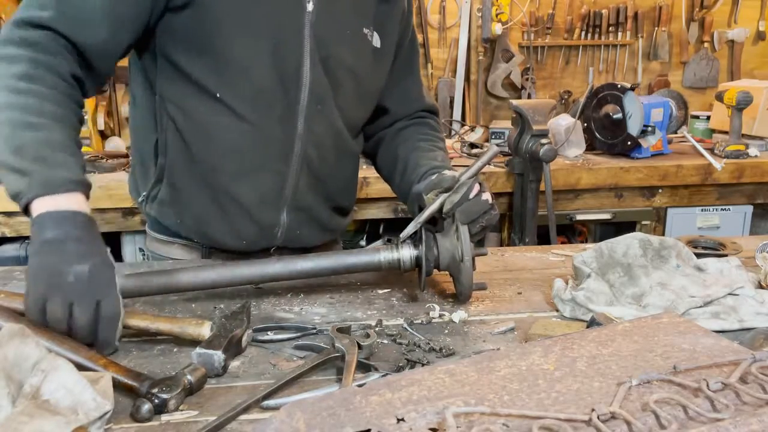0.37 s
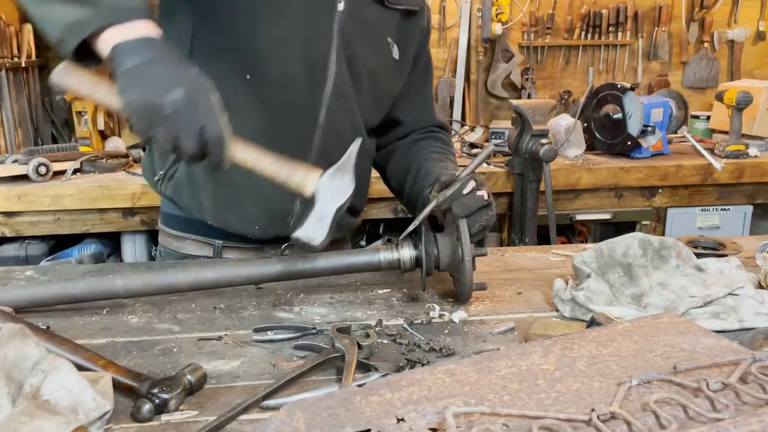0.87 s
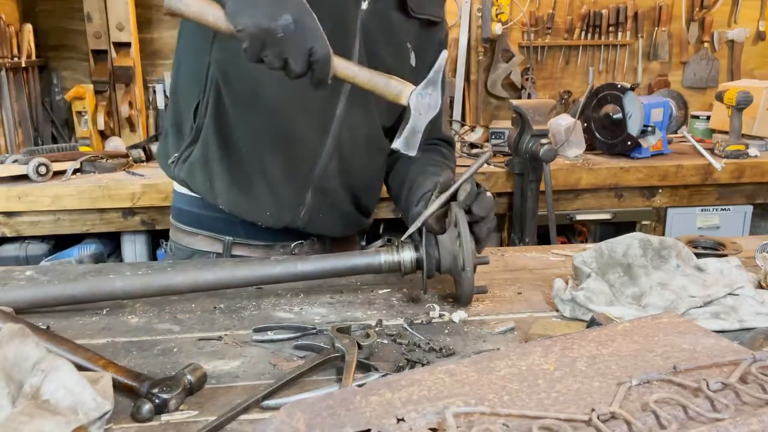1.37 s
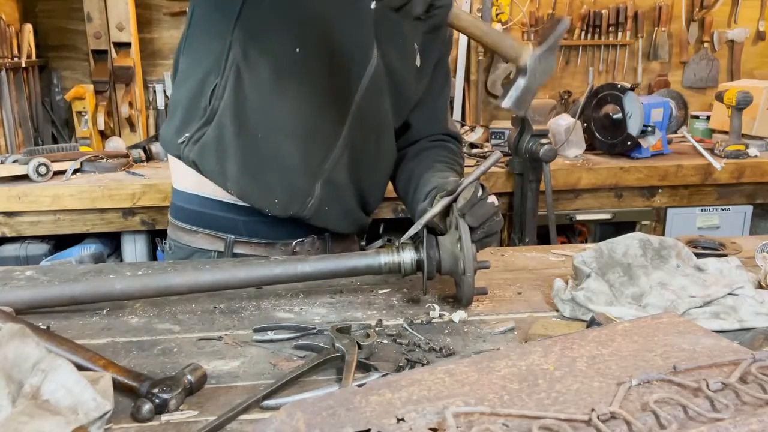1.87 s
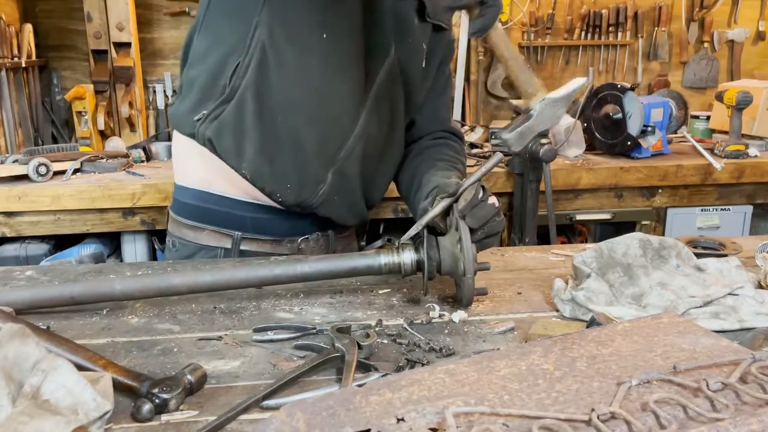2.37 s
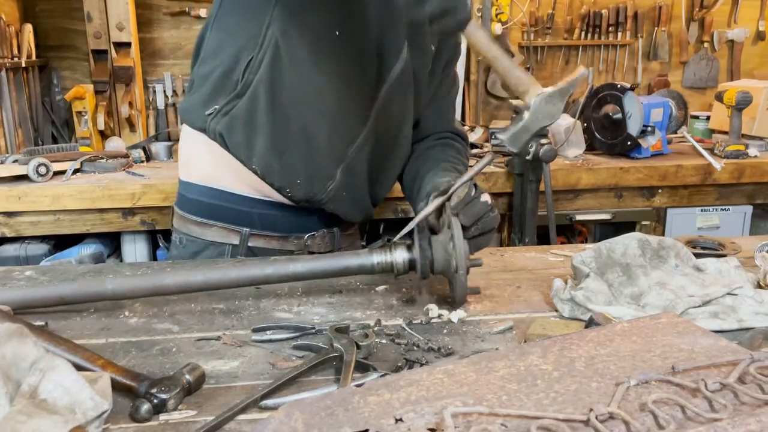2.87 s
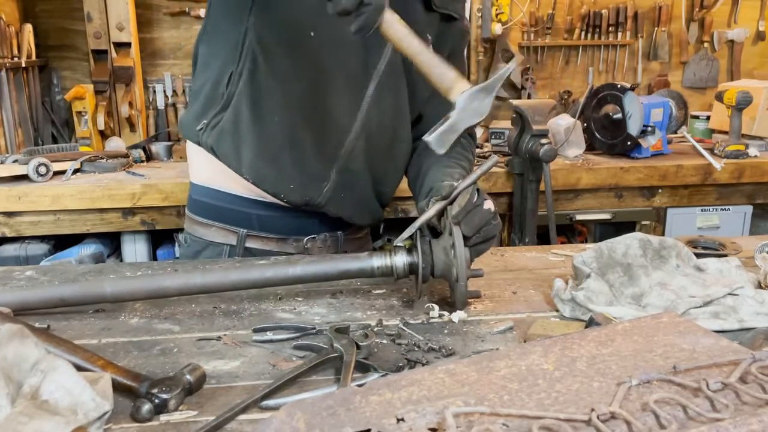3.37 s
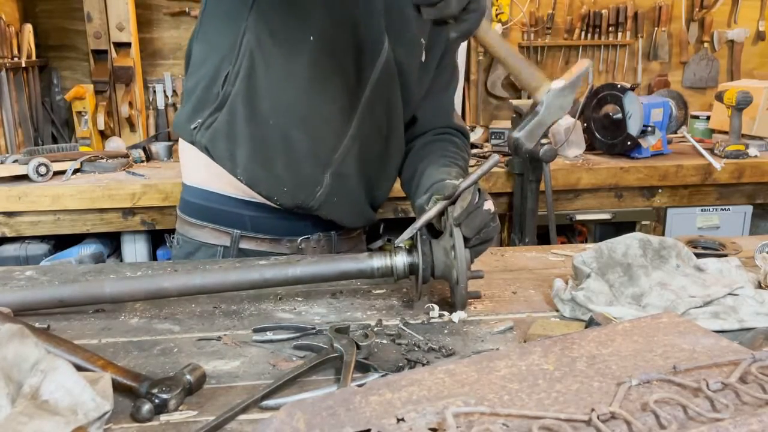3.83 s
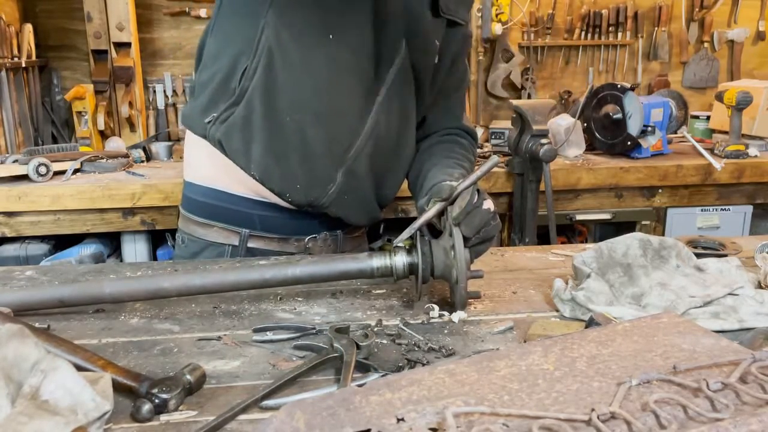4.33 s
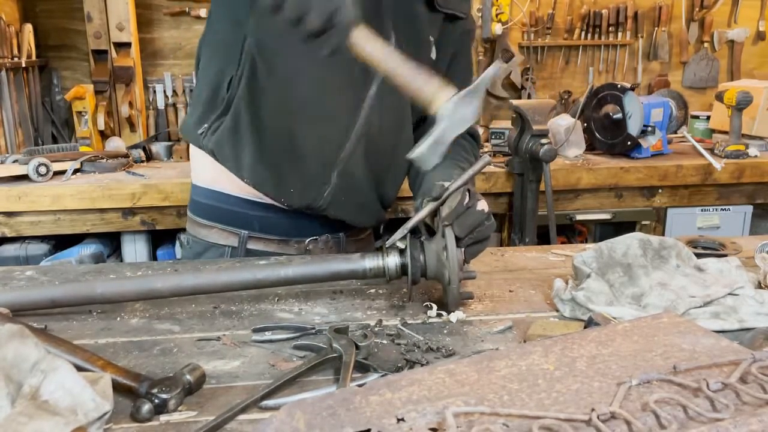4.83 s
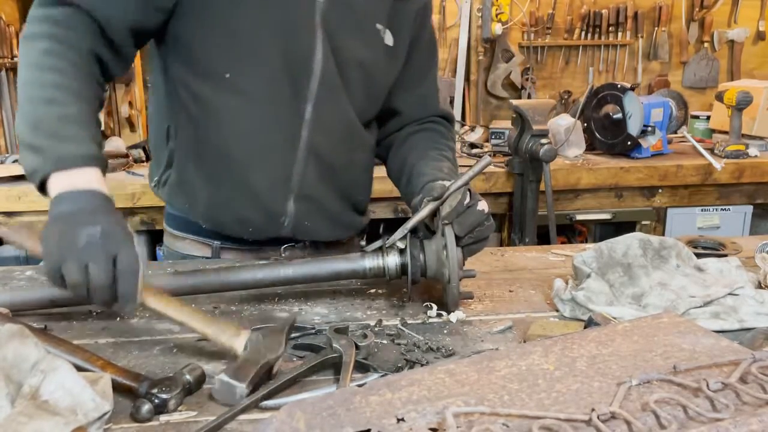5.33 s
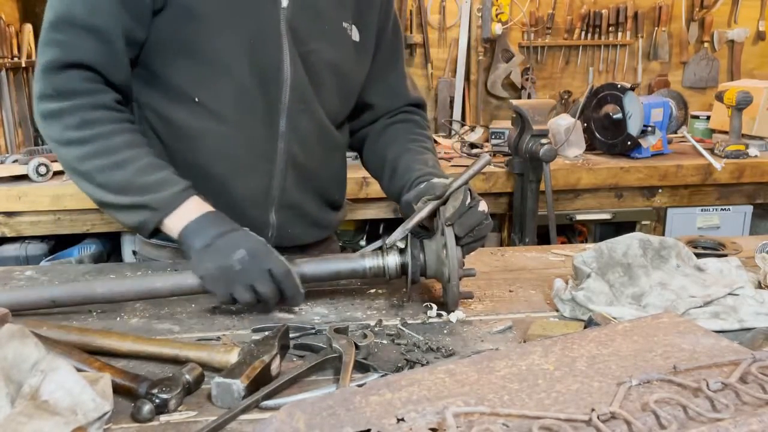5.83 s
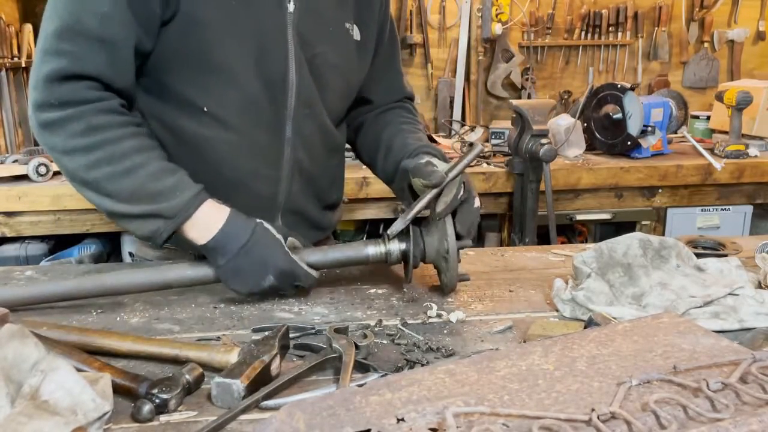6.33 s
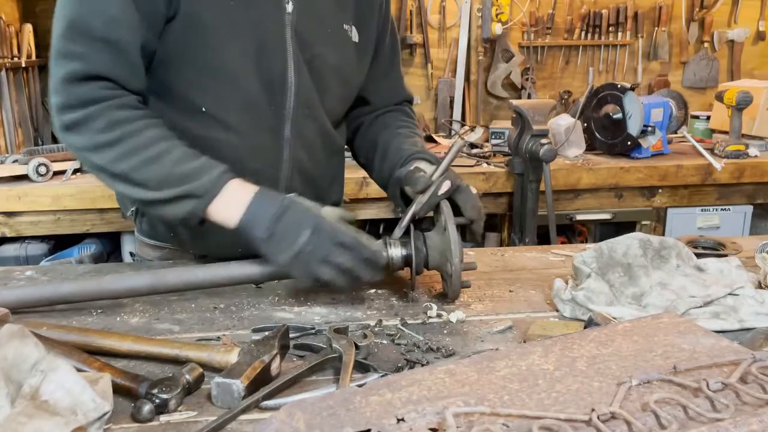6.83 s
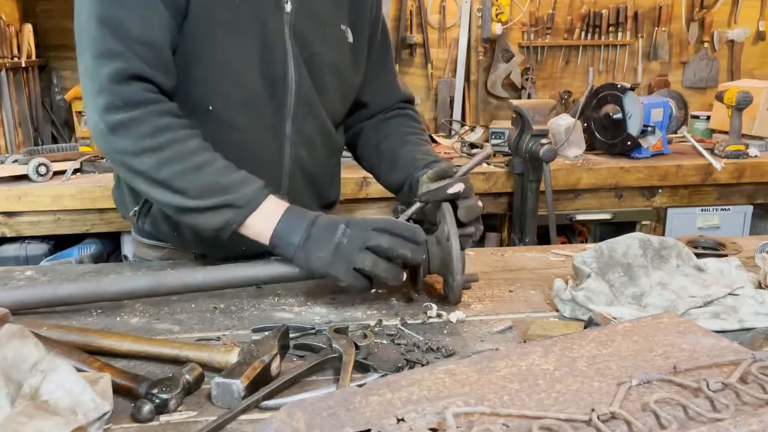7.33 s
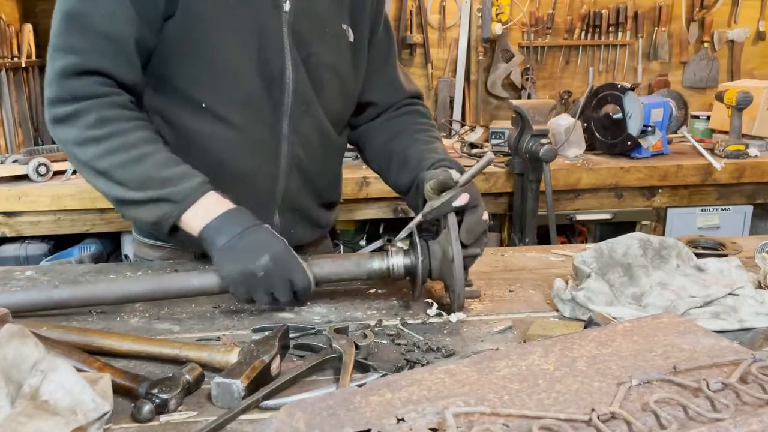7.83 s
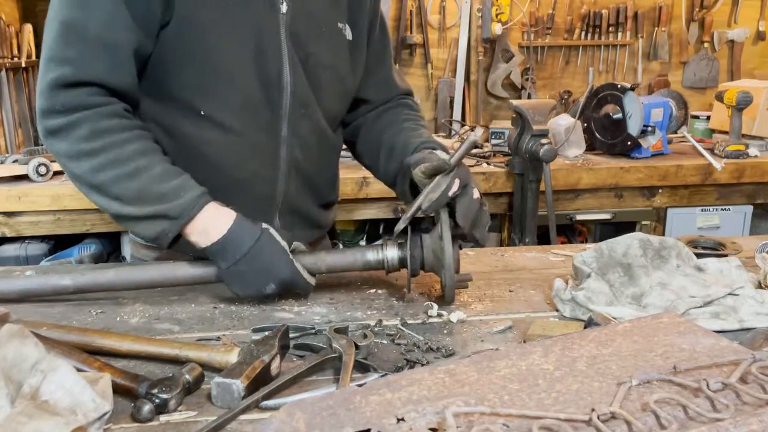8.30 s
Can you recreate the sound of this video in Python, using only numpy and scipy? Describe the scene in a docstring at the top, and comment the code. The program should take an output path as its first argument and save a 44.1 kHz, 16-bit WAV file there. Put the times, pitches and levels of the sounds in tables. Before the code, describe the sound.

Four hard, ringing hammer blows on a chisel against a steel shaft, unevenly spaced, then the hammer clatters down among tools and faint handling follows.

```python
"""In a small workshop a hammer drives a chisel against the hub of a steel shaft on a wooden bench.
Contacts are shaped noise bursts; bench, chisel, hub, shaft, flange, hammer head and loose tools are
decaying resonators, struck, rocked or rubbed by gloved hands. Cloth rustles as filtered noise.
After four blows the hammer is laid down among tools, and the loose hub clicks. A noise tail makes the
room, over a low hum; two ports of a phone hear it, and each blow overloads it with a low thump."""
import sys
import numpy as np
from scipy import signal
from scipy.fft import rfft, irfft, next_fast_len
from scipy.io import wavfile
from scipy.ndimage import uniform_filter1d

SR = 44100
rng = np.random.default_rng(int(sys.argv[2]) if len(sys.argv) > 2 else 0)


def invert_db(x):
    """Field ratio 10**(x/20) for x, a level in decibels (scalar or array-like)."""
    u = np.asarray(x, float) / 20
    return 10 ** u


def log_audio(samples):
    """Write samples as a 16-bit WAV file to the path given in sys.argv[1]."""
    # one column per channel
    frames = np.atleast_2d(samples).T
    # limit to full scale, then quantise
    limited = np.clip(frames, -1, 1)
    pcm = np.round(limited * 32767).astype(np.int16)
    wavfile.write(sys.argv[1], SR, pcm)


N = 372204
SIZE = next_fast_len(N + SR)  # transform length, with a second to spare for the room tail
HZ = np.maximum(np.arange(SIZE // 2 + 1) * SR / SIZE, 1)

# All levels are relative dB.
# Workshop hum spectrum: pitch_hz, level_db
HUM_SPECTRUM = [(12, -46), (20, -11.5), (53, 3), (101, 7), (241, -3.5), (446, -5.5), (1000, -19.5),
                (2670, -22.5), (3070, -34.5), (4060, -34), (4420, -52), (4940, -34.5), (6010, -45),
                (11400, -48), (16000, -67)]
# Hum level over time: time_s, level_db
HUM_LEVEL_CURVE = [(0.0, -53), (2.87, -51.5), (4.6, -50), (4.951, -60), (7.05, -60.5), (8.44, -62)]
# Stereo width of the hum: pitch_hz, side_re_mid_db
HUM_WIDTH = [(30, -26.5), (60, -10.5), (200, -9), (400, 0), (1000, 4), (2400, -7.5), (4400, -2),
             (8000, -10), (15000, -14)]
# Moves of hands and parts: hold_start_s, hold_length_s, shaft_rocking_on_wood_db,
# glove_rubbing_steel_db, cloth_rustle_db
HAND_MOVES = [(0.24, .1, -58.5, -90, -72.5), (0.396, .08, -69, -88, -71), (0.57, 0.17, -61.5, -74.5, -76.5),
              (0.835, .09, -58.5, -72, -74), (1.145, 0.054, -57, -88, -69.5),
              (1.266, 0.046, -66, -75, -64.5), (1.358, 0.01, -42, -54.5, -70.5), (1.465, .1, -57, -78, -70),
              (1.787, 0.073, -71, -89, -65), (1.95, 0.086, -72, -95, -80), (2.948, 0.11, -53, -55, -42),
              (3.068, .2, -41.5, -58, -52), (3.316, 0.14, -54.5, -67, -73), (3.573, 0.029, -59, -72.5, -98),
              (3.739, 0.037, -59, -71, -76.5), (4.096, 0.1, -60.5, -75, -61),
              (4.532, 0.031, -27.5, -36.5, -36.5), (4.617, .12, -54, -54, -48),
              (4.875, 0.061, -59, -94.5, -77), (5.038, 0.063, -62.5, -75.5, -73),
              (5.49, 0.17, -37.5, -84, -67.5), (5.75, 0.21, -73.5, -77, -76),
              (6.038, 0.18, -69, -69.5, -70), (6.216, 0.1, -52, -69.5, -63), (6.374, 0.11, -69.5, -81, -74),
              (6.511, 0.12, -61.5, -66.5, -65), (6.7, 0.072, -61.5, -69, -70.5),
              (6.794, 0.11, -56.5, -62.5, -68.5), (6.962, 0.13, -63.5, -94, -71.5),
              (7.114, 0.17, -66.5, -64.5, -67), (7.307, 0.24, -79.5, -87, -86), (7.53, .12, -79, -76, -77),
              (7.707, 0.25, -74, -83.5, -76.5), (7.985, 0.094, -71, -86, -65),
              (8.194, 0.041, -34, -60.5, -52.5), (8.279, 0.058, -62.5, -68, -59.5)]
# Cloth rustle spectrum: pitch_hz, level_db
CLOTH_SPECTRUM = [(1500, 12), (3000, 11), (6000, 5), (9000, 5), (13000, -12.5), (15000, -16)]
# Chisel touching steel: start_s, crack_db, bench_db, chisel_ring_db, tilt_db_per_octave
CHISEL_TOUCHES = [(0.413, -21, -73, -45, -4.5), (0.6075, -41, -54, -59, -3), (1.1544, -32, -77, -50, -12),
                  (1.3623, -27, -52, -38.5, -2), (1.515, -55, -78, -39.5, -10),
                  (2.25, -18.5, -26.5, -31, -2.7), (2.9445, -21, -33.5, -32, -3),
                  (4.0781, -29, -36, -49, -3.5), (5.0578, -43, -55, -55, -0.8),
                  (7.1182, -49.5, -68, -46.5, 0.7)]
# Small bumps and clicks of handling, dull or bright:
# start_s, crack_db, bench_db, tilt_db_per_octave, chatter_ms
HANDLING_BUMPS = [(0.891, -50, -55, -1.1, 27), (1.26, -50, -62, -0.3, 8.7), (3.4197, -44.5, -87, -3, 8.9),
                  (3.7775, -69, -48.5, 1.1, 9.5), (4.8478, -46.5, -58, 0.5, 8), (6.1482, -64, -47, -6, 9.7),
                  (6.4798, -51, -67, -1.1, 12.7), (6.9191, -47, -47.5, -4, 7.2),
                  (7.0481, -60.5, -59.5, -5.5, 12.7), (7.222, -68.5, -55, -2.5, 8.6),
                  (7.5831, -64.5, -50, -0.3, 8.5), (7.988, -45.5, -50.5, 7, 8.3),
                  (8.1844, -41, -37.5, -9, 16)]
# Hammer on chisel: start_s, crack_db, bench_thud_db, ring_passed_from_chisel_to_shaft_db,
# favoured_shaft_pitch_hz (set by the contact point)
HAMMER_BLOWS = [(2.218, -6, -14.5, -0.5, 3600), (2.89, 1, -10.5, 5, 4180), (3.936, 2.5, -11.5, -6.5, 5460),
                (4.497, 5, -9, 2, 3150)]
# Hammer laid down among loose tools: start_s, crack_db, bench_db, tools_db, tilt_db_per_octave
LAYING_DOWN = [(5.2974, -36.5, -22, -76, -1.5), (5.303, -25.5, -29, -52.5, -1.04),
               (5.3368, -27, -37, -53.5, -2), (5.4078, -47, -36, -62, 2.5), (5.4318, -37, -29, -32, -2.5),
               (5.4378, -15, -27.5, -54, -2.36), (5.48, -31.5, -30.5, -43.5, 0.6),
               (5.5314, -23, -37, -36.5, -2.7), (5.5871, -16, -58, -15, -4),
               (5.6073, -21.5, -57.5, -27, -4), (5.6635, -25, -45.5, -30.5, -4)]
# Clicks of the loose hub: start_s, crack_db, bench_db, hub_ring_db, tilt_db_per_octave
HUB_CLICKS = [(6.2276, -46, -47, -51.5, -0.2), (7.5285, -46.5, -73, -41.5, 1.1),
              (7.734, -68.5, -74, -63, -2.8), (8.0448, -76, -65, -57, -5)]
# Contact noise spectrum: pitch_hz, level_db
CRACK_SPECTRUM = [(120, -30.5), (200, 4), (416, -4.5), (722, 2.5), (1620, -15), (2050, -7.5), (2470, -15.5),
                  (3970, -11.5), (5420, -13), (6520, -17.5), (8740, -11), (11500, -33), (12200, -20.5),
                  (14900, -29.5), (16000, -43.5)]

# Modes of the wooden bench: pitch_hz, level_db, t60_s
BENCH_MODES = [(107.4, -8, 0.2), (184, -0.5, 0.043), (207, -4.5, 0.04), (239.4, -6, 0.13), (306, -3, 0.061),
               (403.6, -10.5, .12), (464, -11, 0.12), (570, -8, .06), (725, -10, .06), (752, -13, 0.13),
               (880, -17, 0.087), (999, -18.5, 0.046), (1223, -19, 0.12)]
# Mode of the bench top: pitch_hz, level_db, t60_s
BENCH_TOP_MODE = [(124, 0.0072, 0.31)]
# Modes of the flange: pitch_hz, level_db, t60_s
FLANGE_MODES = [(606, -7.5, .06), (683.8, 1.5, 0.14), (720, -11.5, 0.017), (940, -13.5, 0.018)]
# Modes of the overload thump: pitch_hz, level_db, t60_s
OVERLOAD_MODES = [(40, 10, 0.15), (68, 8.5, 0.088), (185, 21, 0.069)]
# Modes of the loose tools: pitch_hz, level_db, t60_s
TOOL_MODES = [(719, -7.5, .069), (990, -0.5, 0.052), (1207, 0, 0.071), (1606, -9, 0.0595), (1816, -7, .12),
              (1970, -10, 0.13), (2130, -11.5, .07), (2287, 4.5, 0.046), (2640, -12.5, .066),
              (2934, -5.5, 0.12), (3080, -12.5, .12), (3500, -15, .07), (4016, -14.5, .1),
              (4330, -12.5, .08)]
# Chisel mode pitches: pitch_hz
CHISEL_PITCHES = [678, 1295, 1335, 2126, 2722, 3225, 4088, 5095, 5215, 7200]
# Chisel mode rings: level_db, t60_s
CHISEL_RINGS = [(-1, .18), (-24, .65), (0, .11), (-7, .24), (-13, .28), (-16, .25), (-18, .3), (-21, .35),
                (-16, .26), (-30, .2)]
# Hub mode pitches: pitch_hz
HUB_PITCHES = [1922, 3217, 4285, 4700, 5432, 5766, 6075, 6795, 7208]
# Hub mode rings: level_db, t60_s
HUB_RINGS = [(-2, .11), (-3, .25), (-10, .1), (-22, .15), (-12, .08), (-10, .1), (-16, .16), (-22, .25),
             (-28, .22)]
# Shaft mode pitches: pitch_hz
SHAFT_PITCHES = [1965, 2094, 2695, 3047, 3650, 3968, 4072, 4274, 4605, 4646, 5500, 5820, 6400]
# Shaft mode rings: level_db, t60_s
SHAFT_RINGS = [(-9.5, .19), (-7.5, .35), (-5, .25), (-5, .24), (-11, .43), (-6, .3), (-3, .33), (-11, .3),
               (-9, .2), (-2, .13), (-11, .25), (-8.5, .11), (-8, .22)]
# Hammer head mode pitches: pitch_hz
HEAD_PITCHES = [8100, 10365, 10372]
# Hammer head mode rings: level_db, t60_s
HEAD_RINGS = [(-12, .8), (-14, .6), (-6, .95)]

# Reverberation time: pitch_hz, t60_s
ROOM_DECAY = [(60, .4), (250, .7), (1000, .65), (3000, .55), (6000, .42), (12000, .24)]
# Reverberation spectrum: pitch_hz, level_db
ROOM_SPECTRUM = [(60, -24.5), (250, -28.5), (1000, -35.5), (3000, -26.5), (6000, -37), (12000, -38)]
# Stereo width of the room: pitch_hz, side_re_mid_db
ROOM_WIDTH = [(60, -18.5), (125, -17), (300, -5), (700, -1), (1500, 7.5), (3000, -6), (5000, -10),
              (8000, -19.5), (15000, -13.5)]
# Stereo width of the direct sound: pitch_hz, side_gain_db
DIRECT_WIDTH = [(60, -30), (125, -20), (300, -17), (700, -2.5), (1500, -3.5), (3000, -3), (5000, -7.5),
                (8000, -16.5), (15000, -18)]
# Phase between the ports: pitch_hz, left_lead_rad
PORT_LEAD = [(4000, 0), (6300, -.5), (7670, -2.9), (8870, -3.5), (10700, -5.9), (12700, -6.8),
             (13900, -9.2), (15800, -9.5)]
# Level between the ports: pitch_hz, left_minus_right_db
PORT_DIFFERENCE = [(60, 0.8), (110, -0.7), (200, 0.5), (380, 1), (700, 3.5), (1290, 0), (2380, 1.5),
                   (4400, 5), (8120, -1.5), (15000, 1)]

BLOW_TILT_DB_PER_OCTAVE = 1.17
BLOW_CHATTER_MS, TAP_CHATTER_MS, LAYING_CHATTER_MS = 3.5, 6.5, 9.9


def along(table, hz=HZ):
    """Linear interpolation of a spectrum on a log-frequency axis."""
    pitch_hz, value = np.array(table).T
    return np.interp(np.log(hz), np.log(pitch_hz), value)


def shape(x, gain):
    """Linear filtering: multiply the spectrum by a gain over frequency."""
    return irfft(rfft(x, SIZE) * gain, SIZE)[..., :N]


def unit(x):
    """Normalization to unit rms."""
    return x / np.sqrt(np.mean(x ** 2))


def spread(mid, side, width):
    """Sum and difference stereo: left is mid plus coloured side, right is mid minus it."""
    side = shape(side, invert_db(along(width)))
    return np.array([mid + side, mid - side])


def ring(modes, s, db, tilt_db=0., rub=0., scatter_db=3.5, rattle_db=0., favour_hz=np.inf):
    """Modal superposition: hits excite damped resonators and rubbing sustains them; mid and side."""
    favour_peak_db, favour_width_octaves = 11, .11
    at = np.round(s * SR).astype(int)
    chance = rng.standard_normal((len(s), len(modes)))
    hold = SR // 140  # samples between random rattle levels
    out = np.zeros((2, N))
    for k, (hz, mode_db, t60) in enumerate(modes):
        r = np.exp(-np.log(1000) / (t60 * SR))
        w = 2 * np.pi * hz / SR
        push = np.zeros(N) + rub * np.sqrt(1 - r * r)
        distance = (np.log2(favour_hz) - np.log2(hz)) / favour_width_octaves
        favour_db = favour_peak_db * np.exp(-distance ** 2)
        # a soft contact has a negative tilt and favours the low modes
        hit_db = db + favour_db + tilt_db * np.log2(hz / 1000) + scatter_db * chance[:, k]
        push[at] += invert_db(hit_db)
        mode = signal.lfilter([invert_db(mode_db) * np.sin(w)], [1, -2 * r * np.cos(w), r * r], push)
        # loose parts touch and let go, so each ring wavers
        waver = invert_db(rattle_db * rng.standard_normal(N // hold + 1))
        mode *= np.interp(np.arange(N), hold * np.arange(N // hold + 1), waver)
        # signs alternate between neighbouring modes; the side lags by a quarter cycle
        out[0] += (-1) ** k * mode
        out[1] += (-1) ** (k // 2) * np.roll(mode, round(np.pi / 2 / w))
    return out


def all_contacts():
    """Superposition of impacts: start, crack, bench level, tilt and chatter of every contact."""
    groups = (HAMMER_BLOWS, CHISEL_TOUCHES, HUB_CLICKS, HANDLING_BUMPS, LAYING_DOWN)
    blows, taps, clicks, bumps, laid = (np.array(x).T for x in groups)
    s, crack_db, bench_db = np.hstack([x[:3] for x in (blows, taps, clicks, bumps, laid)])
    blow_tilt_db = np.full(len(blows[0]), BLOW_TILT_DB_PER_OCTAVE)
    tilt_db = np.hstack([blow_tilt_db, taps[4], clicks[4], bumps[3], laid[4]])
    chatter_ms = np.hstack([np.full(len(blows[0]), BLOW_CHATTER_MS),
                            np.full(len(taps[0]) + len(clicks[0]), TAP_CHATTER_MS),
                            bumps[4], np.full(len(laid[0]), LAYING_CHATTER_MS)])
    return s, crack_db, bench_db, tilt_db, chatter_ms


def hum():
    """Stationary filtered noise: a low drone and hiss, sinking once the hammering is over."""
    noise = unit(shape(rng.standard_normal((2, N)), invert_db(along(HUM_SPECTRUM))))
    level_db = np.interp(np.arange(N) / SR, *np.array(HUM_LEVEL_CURVE).T)
    return invert_db(level_db) * spread(*noise, HUM_WIDTH)


def moves(column):
    """Amplitude envelope of one layer of handling: every move swells, holds and dies away."""
    rise_s, fall_db_per_s = .03, 256.5
    t = np.arange(N) / SR
    rows = np.array(HAND_MOVES)
    out = np.zeros(N)
    for start, length, db in zip(rows[:, 0], rows[:, 1], rows[:, column]):
        a = max(int((start - rise_s) * SR), 0)
        b = int((start + length + .5) * SR)
        rise = np.clip(1 + (t[a:b] - start) / rise_s, 0, 1) ** 2
        out[a:b] += rise * invert_db(db - fall_db_per_s * np.maximum(t[a:b] - start - length, 0))
    return out


def grit(spread_db, rate):
    """Dry friction: noise whose level jumps from grain to grain, at a rate in Hz."""
    hold = int(SR / rate)
    jumps = np.repeat(rng.exponential(size=N // hold + 1), hold)[:N]
    return unit(rng.standard_normal(N) * uniform_filter1d(invert_db(spread_db * jumps), hold))


def cloth():
    """Fibre friction: two grainy noises, for mid and side, filtered to a rustle."""
    grains = np.array([grit(2.2, 45), grit(2.6, 60)])
    return moves(column=4) * unit(shape(grains, invert_db(along(CLOTH_SPECTRUM))))


def bench():
    """Modal response of wood: every contact thumps the bench and the rocking shaft keeps it sounding."""
    s, _, bench_db, tilt_db, _ = all_contacts()
    rock = moves(column=2) * grit(1.5, 90)
    return ring(BENCH_MODES, s + .002, bench_db, tilt_db, rock)


def chisel(rub):
    """Energy sharing: the chisel rings when struck, touched or rubbed, less when ring passes to the shaft."""
    ring_db, slope = -23.5, 0.18  # ring at a 0 dB crack with 0 dB passed on; dB per dB of crack
    blows, taps = np.array(HAMMER_BLOWS).T, np.array(CHISEL_TOUCHES).T
    blow_db = ring_db + slope * blows[1] - blows[3]
    blow_tilt_db = np.full(len(blows[0]), BLOW_TILT_DB_PER_OCTAVE)
    return ring(np.column_stack([CHISEL_PITCHES, CHISEL_RINGS]), np.r_[blows[0], taps[0]],
                np.r_[blow_db, taps[3]], np.r_[blow_tilt_db, taps[4]], rub, scatter_db=3.25, rattle_db=2.0)


def hub(rub):
    """Frictional and impulsive excitation: the hub sings under the glove and rings when it clicks."""
    s, _, _, ring_db, tilt_db = np.array(HUB_CLICKS).T
    return ring(np.column_stack([HUB_PITCHES, HUB_RINGS]), s, ring_db, tilt_db, invert_db(-2.5) * rub,
                scatter_db=2.5, rattle_db=2.5)


def room(x, first_s=.006):
    """Diffuse reverberation: a dense noise tail swells in over first_s, each octave dying at its own rate."""
    t = np.arange(SR) / SR
    hz = np.maximum(np.arange(SR // 2 + 1), 1)
    noise = rfft(rng.standard_normal((2, SR)))
    tail = 0
    for centre in 44 * 2. ** np.arange(9):
        octave = np.cos(np.pi / 2 * np.clip(np.log2(hz / centre), -1, 1)) ** 2
        band = irfft(noise * octave, SR)
        tail = tail + band * invert_db(along(ROOM_SPECTRUM, centre) - 60 * t / along(ROOM_DECAY, centre))
    tail = tail * np.clip(t / first_s, 0, 1) ** 2 / np.sqrt(SR / 100)
    return spread(*shape(x, rfft(tail, SIZE)), ROOM_WIDTH)


def cracks(rattle_db=-15.0, rattle_s=0.053):
    """Contact chatter: milliseconds of noise, then the rattle of loose parts; softer contact is duller."""
    s, crack_db, _, tilt_db, chatter_ms = all_contacts()
    t = np.arange(8192) / SR
    hz = np.maximum(np.arange(4097) * SR / 8192, 100)
    colour = invert_db(along(CRACK_SPECTRUM, hz) + tilt_db[:, None, None] * np.log2(hz / 1000))
    bursts = irfft(rfft(rng.standard_normal((len(s), 2, len(t)))) * colour, len(t))
    # both decays are times to fall to 1/e
    fades = np.exp(-1000 * t / np.maximum(chatter_ms, .5)[:, None])
    fades = (fades + invert_db(rattle_db) * np.exp(-t / rattle_s)) * np.minimum(t / 0.00035, 1)
    out = np.zeros((2, N + len(t)))
    for start, gain, burst, fade in zip(s, invert_db(crack_db), bursts, fades):
        out[:, round(start * SR):][:, :len(t)] += gain * unit(burst) * fade / 2
    return out[:, :N]


def shaft():
    """Mode selection by contact point: ring passed on by the chisel favours shaft modes near one pitch."""
    ring_db, slope = -32.5, 0.34  # ring at a 0 dB crack with 0 dB passed on; dB per dB of crack
    s, crack_db, _, passed_db, favour_hz = np.array(HAMMER_BLOWS).T
    return ring(np.column_stack([SHAFT_PITCHES, SHAFT_RINGS]), s, ring_db + slope * crack_db + passed_db,
                favour_hz=favour_hz, scatter_db=2.5, rattle_db=4.5)


def hammer_head():
    """Impulsive excitation: high head modes whose level grows faster than the crack's."""
    ring_db, slope = -42, 1.9  # ring at a 0 dB crack; dB per dB of crack
    s, crack_db = np.array(HAMMER_BLOWS).T[:2]
    return ring(np.column_stack([HEAD_PITCHES, HEAD_RINGS]), s, ring_db + slope * crack_db,
                scatter_db=4.5, rattle_db=3.)


def flange():
    """Damped modal response: the flange answers each blow's thud 2 ms late."""
    s, _, thud_db = np.array(HAMMER_BLOWS).T[:3]
    return ring(FLANGE_MODES, s + .002, thud_db - 2.74)


def overload_thump():
    """Overload, modelled as damped low modes: a low thump as each blow overloads the phone."""
    lag_s, level_db = 0.0036, -38.5  # level at a 0 dB crack with 0 dB passed on
    slope, per_passed = 1.2, 2.4  # dB per dB of crack and of ring passed on
    s, crack_db, _, passed_db, _ = np.array(HAMMER_BLOWS).T
    thump_db = level_db + slope * crack_db + per_passed * passed_db
    return ring(OVERLOAD_MODES, s + lag_s, thump_db, scatter_db=3.2)[0]


def bench_top():
    """Single resonance: the bench top booms 5.5 ms after each blow."""
    s, _, thud_db = np.array(HAMMER_BLOWS).T[:3]
    return ring(BENCH_TOP_MODE, s + 0.0055, thud_db - 6.5)


def tools():
    """Modes of loose bodies: tools ring with a strong waver as the hammer is laid among them."""
    s, _, _, tools_db, tilt_db = np.array(LAYING_DOWN).T
    return ring(TOOL_MODES, s, tools_db, tilt_db, scatter_db=1.5, rattle_db=7.)


def scene():
    """Superposition of direct sound, reverberation, hum and overload thump."""
    rub = moves(column=3) * grit(2.3, 150)  # one glove friction drives chisel and hub
    handled = cloth() + bench() + chisel(rub) + hub(rub)
    struck = cracks() + shaft() + hammer_head() + flange() + bench_top() + tools()
    high_pass = signal.butter(2, 70., "high", fs=SR, output="sos")
    near = signal.sosfilt(high_pass, handled + struck)
    return spread(*near, DIRECT_WIDTH) + invert_db(8.0) * room(near[0]) + hum() + overload_thump()


def roll_off(x):
    """The treble ends steeply here."""
    return signal.sosfilt(signal.butter(12, 16160, fs=SR, output="sos"), x)


def record(dry):
    """Two-port reception: ports differ in level and treble phase; saturation rounds the loudest peaks."""
    half = invert_db(along(PORT_DIFFERENCE) / 2) * np.exp(.5j * along(PORT_LEAD))
    ports = invert_db(-3.5) * shape(dry, np.array([half, 1 / half]))
    rounded = np.tanh(ports / .95) * .95
    mix = shape(rounded, HZ < 16200)
    return roll_off(mix)


dry = scene()
out = record(dry)
log_audio(out)
```